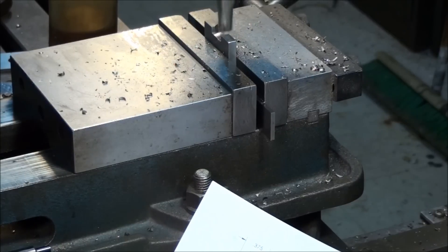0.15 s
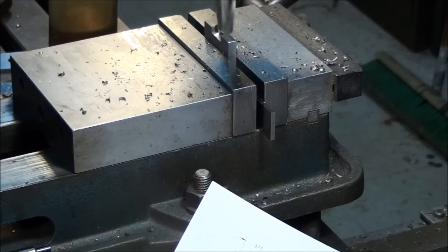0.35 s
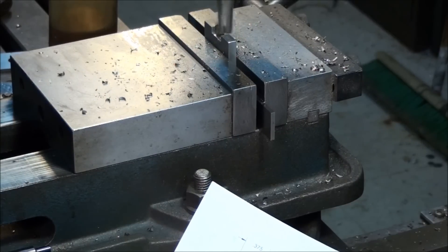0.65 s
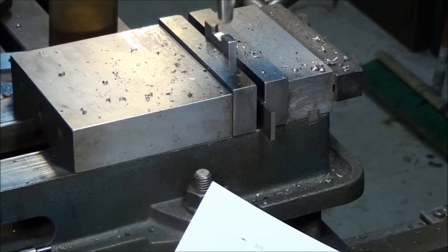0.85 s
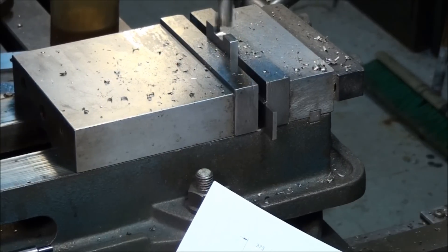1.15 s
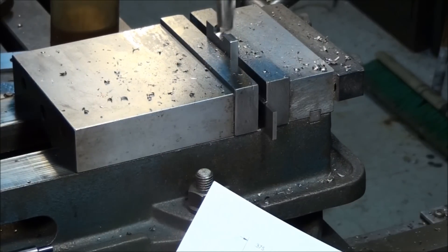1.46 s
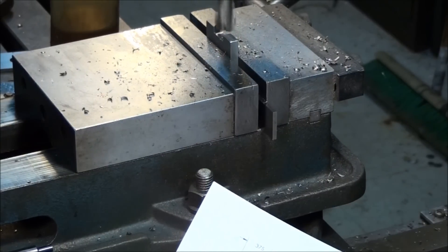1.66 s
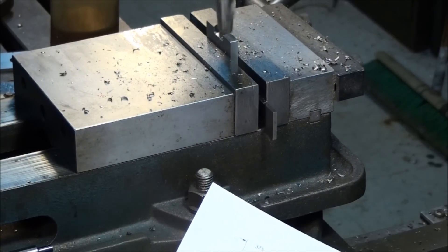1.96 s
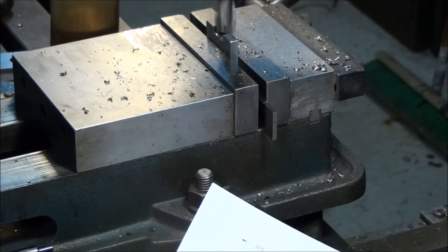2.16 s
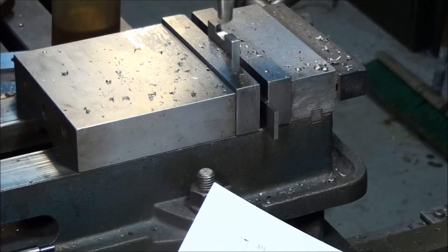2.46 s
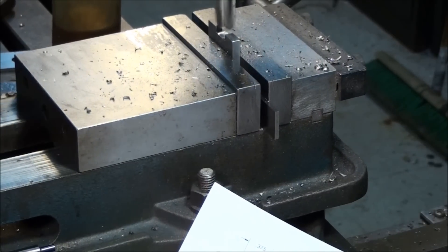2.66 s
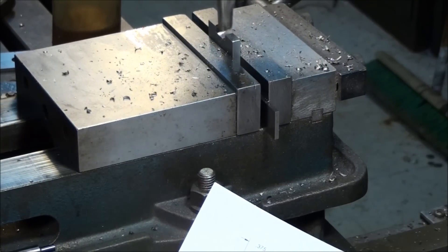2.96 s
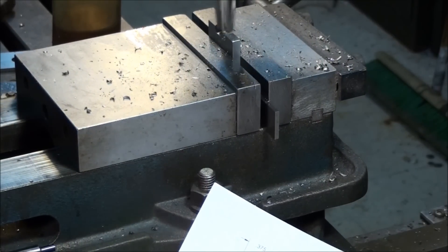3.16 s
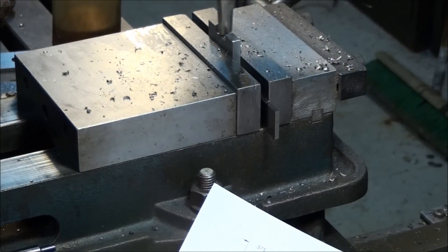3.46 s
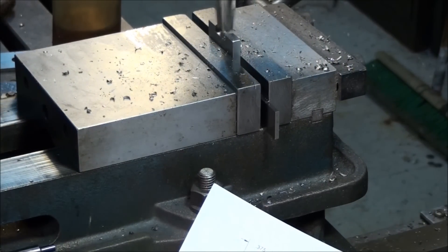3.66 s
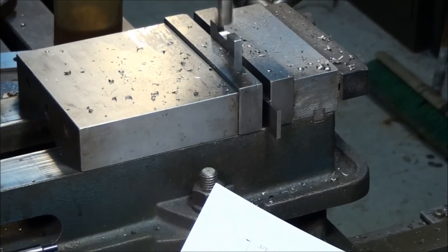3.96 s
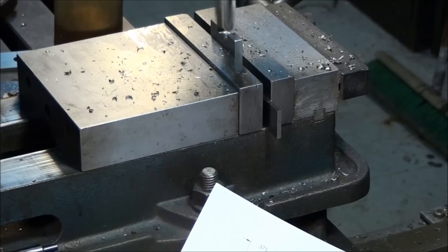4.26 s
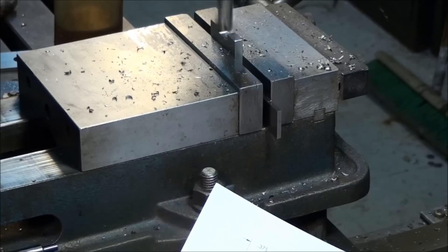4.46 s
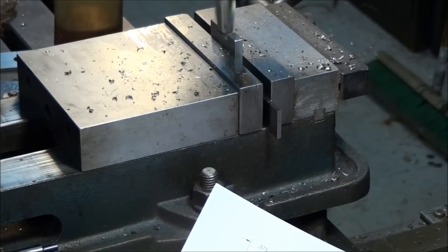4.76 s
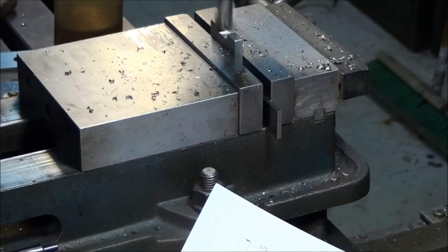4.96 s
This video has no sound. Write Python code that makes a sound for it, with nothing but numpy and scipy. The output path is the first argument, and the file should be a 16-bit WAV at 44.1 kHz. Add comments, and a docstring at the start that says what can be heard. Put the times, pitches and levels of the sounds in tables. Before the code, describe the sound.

A milling machine runs in a workshop, its low motor hum, steady gear whine near 1400 Hz and grainy gear rattle continuous. The sound opens with cutting already under way: teeth strike steel about 28 times a second, a harsh fluttering buzz of bright cracks, rasping, short rising chip squeaks and low casting clatter, with a thin wavering ring around 5 kHz. Individual bites vary, some heavier, some skidding weakly. The cut weakens from about 0.4 s and stops near 0.8 s, leaving the spindle rattling. A second pass enters fairly abruptly at 1.3 s and ends at 2.3 s; a third runs from 2.75 to 3.7 s; a fourth starts more lightly at 4.1 s, builds, and fades by 5 s. Brief high squeals mark the run-outs near 0.5, 2.15, 3.5 and 4.8 s. Close, bright stereo, leaning slightly right, with faint room reverberation.

```python
"""End mill cutting a slot wall

An end mill side-mills the wall of a slot in a steel block, in four passes over the whine of the spindle gears.
Teeth bite 28 times a second: each rings the cutter, tears off a squeaking chip and knocks vice and table.
The cutter sings through each pass, with one squeal in its run-out; the gear train rattles on between passes.
Bites, knocks and chips drive filtered noise and resonances; singing, hum and whine are wavering sines."""
import sys
import numpy as np
from scipy import signal
from scipy.fft import rfft, irfft, next_fast_len
from scipy.io import wavfile
from scipy.ndimage import uniform_filter1d, map_coordinates

SR = 44100
rng = np.random.default_rng(int(sys.argv[2]) if len(sys.argv) > 2 else 0)


def inscribe(sig):
    """Save sig as 16-bit PCM at rate SR to the path in sys.argv[1].

    A 1-D sig is mono; a 2-D sig holds one channel per row.
    Samples are clipped to [-1, 1] before scaling.
    """
    pcm = np.round(np.clip(np.atleast_2d(sig).T, -1, 1) * 32767)
    wavfile.write(sys.argv[1], SR, pcm.astype(np.int16))


N = 224670

# cutter modes: f/Hz, width/Hz, relative level/dB
CUTTER_MODES = [(4446, 41, -1.5), (5027, 23, -1), (6546, 75, -5.5), (7330, 55, -22), (7820, 240, -13),
                (8710, 64, 5.5), (11380, 130, -17), (12220, 73, -6.5), (12370, 160, -6.5),
                (13250, 140, -18), (15600, 260, -32)]
# block and vice modes: f/Hz, width/Hz, relative level/dB
BLOCK_MODES = [(2080, 89, -5.5), (3510, 64, -0.5), (4030, 57, 3), (4210, 54, -3), (4500, 43, 2)]
# table and column modes: f/Hz, width/Hz, relative level/dB
FRAME_MODES = [(59.5, 11, -9), (143.8, 18, 4.5), (169, 20, 2.5), (370.7, 11, -1), (422, 12, 3.5),
               (531.6, 30, 2.5), (640.8, 20.5, 5), (752.5, 15.3, 4), (1165, 12, 5.5), (1314, 44, 3)]
# steady motor and gear tones: f/Hz, level/dB rms
HUM_TONES = [(119.7, -35), (179.3, -42), (420, -40.5), (479.3, -41), (683.7, -40.5), (732, -53),
             (979.8, -39.5), (1293, -39.5), (1642, -47.5)]
# gear mesh and sidebands: offset from mesh tone/motor turns, level/dB rms
MESH_TONES = [(-0.5, -41.5), (0, -30), (0.501, -43), (3.5, -42), (4, -48)]
# gear rattle spectrum: f/Hz, relative density/dB per Hz
GEAR_SPECTRUM = [(35, -25), (90, -11), (135, 6), (280, -2), (450, 3.5), (1230, 1), (1400, 7), (1570, -7.5),
                 (2100, -10.5), (4200, -13), (5200, -18.5), (8700, -21.5), (11500, -30.5), (16000, -40)]
# edge crack spectrum: f/Hz, relative density/dB per Hz
CRACK_SPECTRUM = [(1500, -26), (4000, -8), (5200, 11), (5900, -24), (7000, 5.5), (9300, -8), (10300, -10),
                  (15500, -18)]
# chip tearing spectrum: f/Hz, relative density/dB per Hz
TEAR_SPECTRUM = [(500, -11.5), (1300, 1.5), (2000, 0.5), (3000, 0), (4300, -3), (5900, -8), (8500, -6.5),
                 (15500, -42)]
# casting clatter spectrum: f/Hz, relative density/dB per Hz
CASTING_SPECTRUM = [(35, -30), (110, -9), (150, -10.5), (310, -3), (470, -3), (850, -4), (1100, -0.5),
                    (1380, 2), (1700, -6.5), (2500, -10.5), (4500, -21.5), (9000, -34.5)]
# flat spectrum: f/Hz, relative density/dB per Hz
WHITE_SPECTRUM = [(1000, 0)]
# left-right likeness of noise: f/Hz, correlation/1
LIKENESS = [(120, 1), (300, 0.98), (700, 0.9), (1400, 0.79), (2800, 0.78), (4500, 0.85), (9000, 0.99)]
# stereo balance: f/Hz, left minus right/dB
BALANCE = [(60, 2), (110, 0.5), (200, -1), (380, 0.5), (700, -1.5), (1290, -2.0), (2380, -2.5),
           (4400, -1.5), (8120, -2.5), (15000, -1)]
# workshop decay: f/Hz, t60/s
ROOM_T60 = [(150, 0.77), (1500, 0.4), (5000, 0.78), (13000, 0.11)]
# passes along the wall: first tooth t/s, end t/s, depth of cut/dB, lightness of first teeth/dB (before
# a weight per source), run-out length/s, hardness of bite/dB
CUT_PASSES = [(-.1642, 0.828, 1.34, 3.5, 0.48, -0.5), (1.2925, 2.31, 0.37, 0.3, .25, -0.4),
              (2.7501, 3.732, 0.5, 2, 0.39, 0.7), (4.1027, 5, 0.9, 5.5, 0.33, -2)]
# gear rattle: t/s, relative level/dB
RATTLE_LEVEL = [(.9, -2.5), (1.25, 1), (2.35, -1), (2.62, 1), (3.7, -1), (4.05, -2), (5.05, -0.5)]
# teeth that dig in and take a thick chip: t/s
DIG_TIMES = [.05, .227, .334, .618, 1.328, 1.542, 1.791, 1.862, 1.968, 2.111, 2.147, 2.857, 3.035, 3.177,
             3.319, 4.174, 4.6, 4.636, 4.672]
# teeth that skid and take almost no chip: t/s
SKID_TIMES = [.191, .262, .405, .547, 1.506, 1.897, 2.822, 3.248, 3.284, 4.28, 4.813]
# cutter squeals, one per run-out: start t/s, length/s, level/dB
CUTTER_SQUEALS = [(0.464, 0.085, -29.5), (2.15, 0.1, -31), (3.485, 0.092, -27.5), (4.765, 0.14, -30)]

TOOTH_HZ, MESH_HZ, MOTOR_HZ, TOP_HZ = 28.13, 1400.5, 29.9, 15800
FEED_IN_S = 0.3
# chip thickness, before a weight per source
DIG_DB, SKID_DB, SCATTER_DB = 3, -7, 1.37
SING_DB, SING_GROWS_DB_PER_S, SING_DIES_DB_PER_S = -36.5, 200, 202


def bites(times, thick_db):
    """Each cutting edge cracks into the steel in a burst of tiny slips that ring the cutter."""
    *_, hardness_db = current_pass(times)
    fed_db = engagement(times, entry=1.57, exit_db=-23, bend=1.78)
    bite_db = -16.5 + hardness_db + 1.44 * thick_db + fed_db
    force = strokes(times, bite_db, rise_s=0.00058, hold_s=0.0025, t60_s=0.037, scatter=0.32)
    slips = unit(amp(3.4 * wobble(900)))
    force = force * slips
    cutter = ring(force * noise(WHITE_SPECTRUM), CUTTER_MODES)
    crack = force * noise(CRACK_SPECTRUM)
    return amp(2.5) * cutter + amp(-7.5) * crack


def chips(times, chip_db):
    """The chip shears off in uneven segments, rasping and ringing the block; the rasp weakens in the run-out."""
    force = strokes(times, chip_db, rise_s=0.0021, hold_s=0.0056, t60_s=0.099, scatter=0.4)
    block = ring(force * noise(WHITE_SPECTRUM), BLOCK_MODES)
    thinning = amp(-4.5 * runout(np.arange(N) / SR))
    rasp = force * thinning * noise(TEAR_SPECTRUM)
    return amp(-10.0) * block + amp(-2.0) * rasp


def squeaks(times, chips_db, early_hz, late_hz, glide, rough):
    """Each sliding chip gives a short rising squeak, lower and relatively louder as the pass runs out."""
    out, t = np.zeros(N + 2 * SR), np.arange(SR // 20) / SR
    swell = (t / 0.005) * np.exp(1 - t / 0.0041)
    for s, chip_db in zip(times, chips_db):
        late = runout(s) ** 0.545
        detune, luck = rng.standard_normal(2)
        hz = (early_hz + late * (late_hz - early_hz)) * np.exp(0.0352 * detune)
        shake = unit(uniform_filter1d(rng.standard_normal(len(t)), size=40))
        pitch_hz = hz * (1 + glide * (1 - np.exp(-t / 0.011)) + rough * shake)
        gain = amp(chip_db + 2.2 * late + 1.6 * luck)
        squeak = gain * swell * np.sin(2 * np.pi * np.cumsum(pitch_hz) / SR)
        out[SR + round(s * SR):][:len(t)] += squeak
    return out[SR:SR + N]


def singing(build_s, quit_s):
    """The rubbing flank sustains two cutter bending modes in each pass; squeals raise the lower one."""
    t = np.arange(N) / SR
    rubbing = [sustained(start + build_s, end - quit_s, SING_DB) for start, end, *_ in CUT_PASSES]
    squeals = [sustained(start, start + length, db) for start, length, db in CUTTER_SQUEALS]

    def tone(hz, drift_hz):
        drift_turns = np.cumsum(drift_hz * wobble(60)) / SR
        return np.sqrt(2) * np.sin(2 * np.pi * (hz * t + drift_turns))

    low_flutter, high_flutter = amp(1.8 * wobble(45)), amp(3.5 * wobble(25))
    low = np.max(rubbing + squeals, axis=0) * low_flutter * tone(5038, drift_hz=7.3)
    high = np.max(rubbing, axis=0) * high_flutter * tone(6545, drift_hz=15.6)
    return low + amp(-7.0) * high


def knocks(times, thick_db):
    """Every tooth shoves the table, so the heavy castings drone at multiples of the tooth rate."""
    luck_db = 0.86 * rng.standard_normal(len(times))
    load_db = -18 + 0.5 * thick_db + luck_db + engagement(times, entry=0.69, exit_db=-12, bend=1.19)
    heard = times > 0
    blows = np.bincount(np.round(times[heard] * SR).astype(int), amp(load_db[heard]), N)
    drone = amp(27.0) * ring(blows, FRAME_MODES)
    # countless higher modes answer each blow with the same clatter
    t = np.arange(SR // 6) / SR
    answer = noise(CASTING_SPECTRUM)[:, SR:SR + len(t)] * amp(-60 * t / 0.44) * (1 - np.exp(-t / 0.0062))
    answer = answer / np.linalg.norm(answer[0])
    clatter = signal.fftconvolve(blows[None], answer, axes=1)[:, :N]
    # the force also shudders at random while the edge is in the steel
    force = strokes(times, load_db, rise_s=0.0057, hold_s=0.0039, t60_s=0.25, scatter=0.15)
    shudder = force * noise(CASTING_SPECTRUM)
    return drone + amp(23.0) * clatter + amp(1.8) * shudder


def spindle():
    """Motor hum, gear whine with sidebands spaced by motor speed, and backlash rattling on each turn."""
    t = np.arange(N) / SR
    shaft_s = t + np.cumsum(0.00048 * wobble(5.71)) / SR  # speed wavers

    def tone(hz, db, waver_db):
        level = np.sqrt(2) * amp(db + waver_db * wobble(10))
        return level * np.sin(2 * np.pi * (hz * shaft_s + rng.random()))

    hum = sum(tone(hz, db, waver_db=0.8) for hz, db in HUM_TONES)
    whine = sum(tone(MESH_HZ + k * MOTOR_HZ, db, waver_db=0.1) for k, db in MESH_TONES)
    turn = 2 * np.pi * MOTOR_HZ * shaft_s
    backlash_db = 1.4 * np.sin(turn) + np.sin(2 * turn) + 1.2 * np.sin(4 * turn)
    rattle = unit(amp(backlash_db + 1.46 * wobble(25.09)) * noise(GEAR_SPECTRUM))
    return hum + whine + amp(-24.0 + curve(RATTLE_LEVEL)) * rattle


def workshop(x):
    """Diffuse reverberation: noise decaying at a rate per band, the highest treble fastest, 5 ms late."""
    hz, t, z = signal.stft(noise(WHITE_SPECTRUM)[:, :SR // 2], SR, nperseg=256)
    decay = amp(-60 * t / along(ROOM_T60, hz)[:, None])
    tail = signal.istft(z * decay, SR, nperseg=256)[1]
    tail = np.pad(tail / np.linalg.norm(tail[0]), ((0, 0), (SR // 200, 0)))
    return signal.fftconvolve(x, tail, axes=1)[:, :N]


def teeth():
    """Time (s) at which each tooth enters the steel, and its chip thickness (dB)."""
    times = np.concatenate([np.arange(start, end, 1 / TOOTH_HZ) for start, end, *_ in CUT_PASSES])

    def among(marks):
        return np.abs(times[:, None] - marks).min(axis=1) < .5 / TOOTH_HZ

    scatter_db = SCATTER_DB * rng.standard_normal(len(times))
    return times, DIG_DB * among(DIG_TIMES) + SKID_DB * among(SKID_TIMES) + scatter_db


def current_pass(s):
    """Columns of the pass under way, or last ended, at each time."""
    rows = np.array(CUT_PASSES)
    index = np.searchsorted(rows[:, 0], s, side="right") - 1
    return rows[np.maximum(index, 0)].T


def runout(s):
    """0 while the cutter is deep in the wall, rising to 1 as it leaves the end."""
    _, end, _, _, length, _ = current_pass(s)
    return np.clip(1 - (end - s) / length, 0, 1)


def engagement(s, entry, exit_db, bend):
    """Pass level in dB: changes as the cutter feeds in, holds, then falls ever faster in the run-out."""
    start, _, depth_db, light_db, *_ = current_pass(s)
    feeding = np.clip(1 - (s - start) / FEED_IN_S, 0, 1)
    return depth_db - entry * light_db * feeding + exit_db * runout(s) ** bend


def strokes(times, levels_db, rise_s, hold_s, t60_s, scatter):
    """Tooth force: builds up, holds while the chip is thick, dies away; hold and decay stretch at random."""
    power, t = np.zeros(N + 2 * SR), np.arange(SR // 6) / SR
    lengths = np.exp(scatter * rng.standard_normal(len(times)))
    for s, db, length in zip(times, levels_db, lengths):
        decay = amp(-60 * np.maximum(t / length - hold_s, 0) / t60_s)
        shape = (1 - np.exp(-t / rise_s)) * decay
        power[SR + round(s * SR):][:len(t)] += (amp(db) * shape) ** 2 / length
    return np.sqrt(power[SR:SR + N])


def sustained(start, end, db):
    """Gain of a self-excited vibration that grows to its level, holds and dies away."""
    t = np.arange(N) / SR
    growth_db = SING_GROWS_DB_PER_S * np.maximum(start - t, 0)
    decay_db = SING_DIES_DB_PER_S * np.maximum(t - end, 0)
    return amp(db - growth_db - decay_db)


def ring(x, modes):
    """x through resonances, alternating in sign, that together keep the power of white noise."""
    def response(f):
        h = sum((-1) ** k * amp(db) * 1j * f * w / (c * c - f * f + 1j * f * w)
                for k, (c, w, db) in enumerate(modes))
        return h / np.sqrt(np.mean(np.abs(h) ** 2))
    return filtered(x, response)


def noise(spectrum):
    """Coloured stereo noise of rms 1, its left-right likeness set by frequency."""
    def response(hz):
        turn = np.arccos(np.clip(along(LIKENESS, hz), 0, 1)) / 2
        return amp(along(spectrum, hz)) * np.array([np.cos(turn), np.sin(turn)])
    mid, side = filtered(rng.standard_normal((2, N)), response)
    return unit(np.array([mid + side, mid - side]))


def filtered(x, response):
    """x times a complex response of frequency."""
    size = next_fast_len(N + SR // 2)
    return irfft(rfft(x, size) * response(np.fft.rfftfreq(size, 1 / SR)), size)[..., :N]


def wobble(rate_hz):
    """Smooth random curve, rate_hz knots a second."""
    knots = rng.standard_normal(int(N * rate_hz / SR) + 4)
    return map_coordinates(knots, [np.arange(N) * rate_hz / SR])


def curve(rows):
    """(t/s, value) rows as one value per sample."""
    return np.interp(np.arange(N) / SR, *np.transpose(rows))


def along(points, hz):
    """(f/Hz, value) points read on a log axis."""
    f, v = np.transpose(points)
    return np.interp(np.log(hz + 1), np.log(f), v)


def unit(x):
    """Scale to rms 1."""
    return x / np.sqrt(np.mean(x ** 2) + 1e-20)


def amp(db):
    """Decibels to gain."""
    return 10 ** (np.asarray(db) / 20)


def scene():
    """The cut and its echo over the running machine; chips curl off just after the bite, each its own strength."""
    times, thick_db = teeth()
    lag, luck = rng.standard_normal((len(times), 2)).T
    curls = times + 0.0012 * np.abs(lag)
    fed_db = engagement(times, entry=0.65, exit_db=-13.5, bend=5.2)
    chip_db = -16.5 + 0.95 * thick_db + 1.5 * luck + fed_db
    squeak = squeaks(curls, chip_db, early_hz=4121, late_hz=3418, glide=0.123, rough=0.03)
    cut = bites(times, thick_db) + chips(curls, chip_db) + amp(-1.0) * squeak
    echoed = cut + amp(-13) * workshop(cut)
    return echoed + singing(build_s=.06, quit_s=.03) + knocks(times, thick_db) + spindle()


def record(dry, ceiling=0.62):
    """Stereo pickup, mostly stronger on the right, that rounds off the highest peaks and cuts the top treble."""
    placed = filtered(dry, lambda hz: amp(np.outer([.5, -.5], along(BALANCE, hz))))
    rounded = placed / (1 + np.abs(placed / ceiling) ** 5) ** (1 / 5)
    return filtered(rounded, lambda hz: hz < TOP_HZ)


dry = scene()
out = record(dry)
inscribe(out)
```